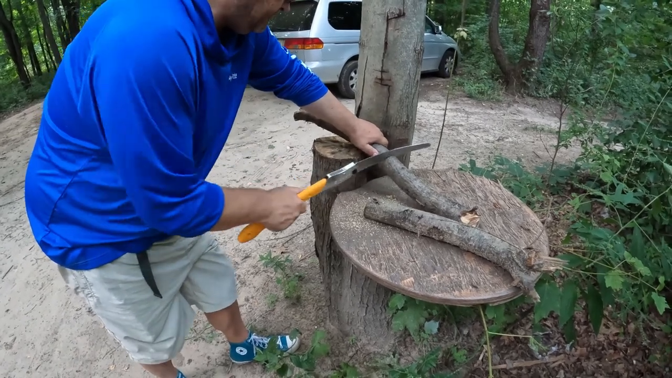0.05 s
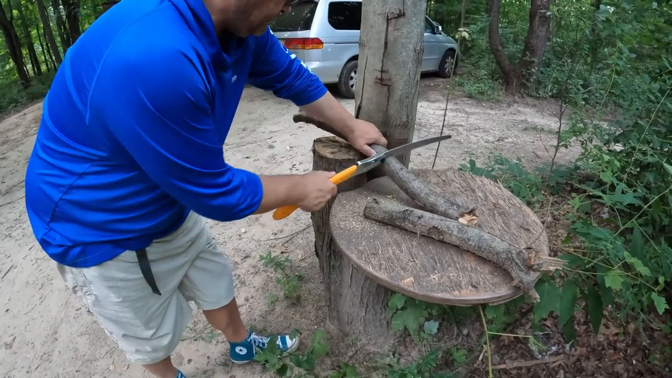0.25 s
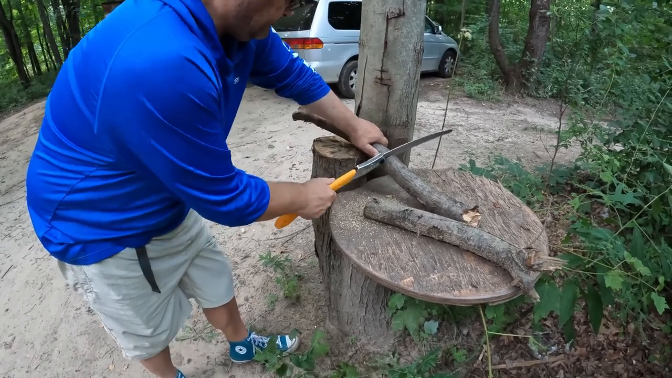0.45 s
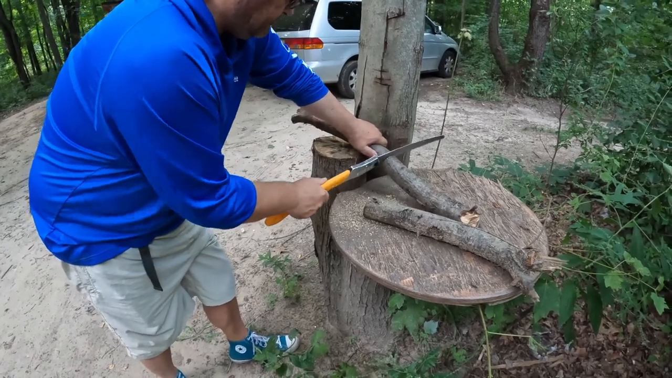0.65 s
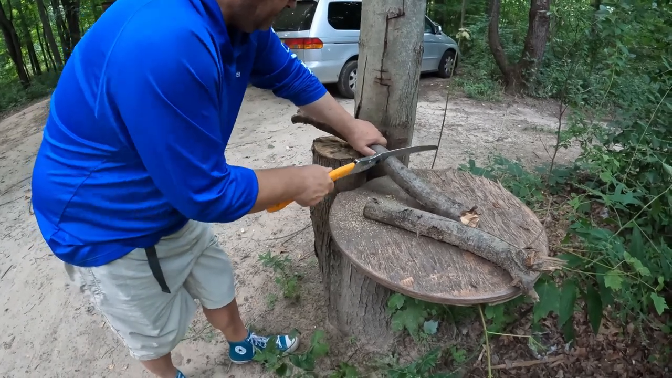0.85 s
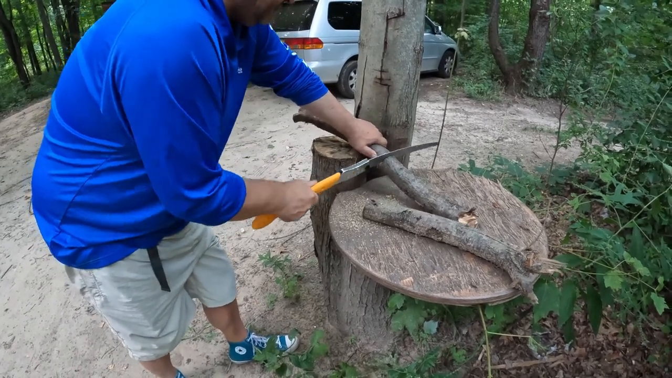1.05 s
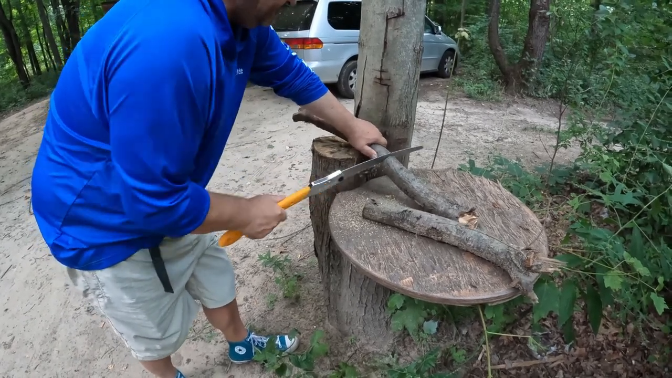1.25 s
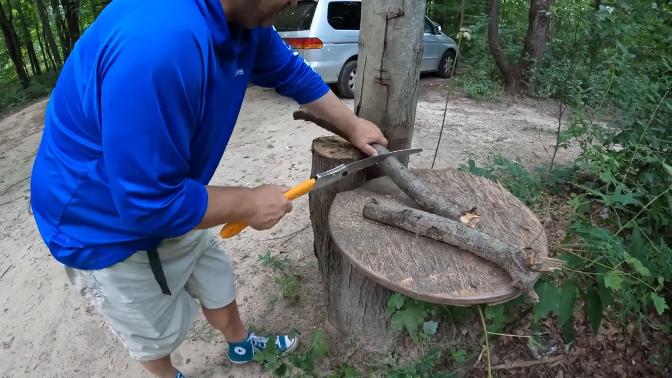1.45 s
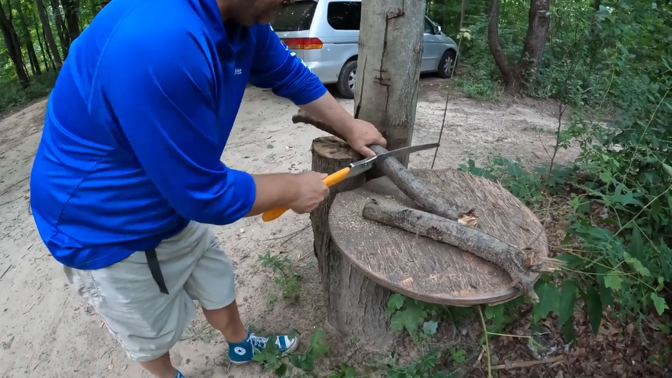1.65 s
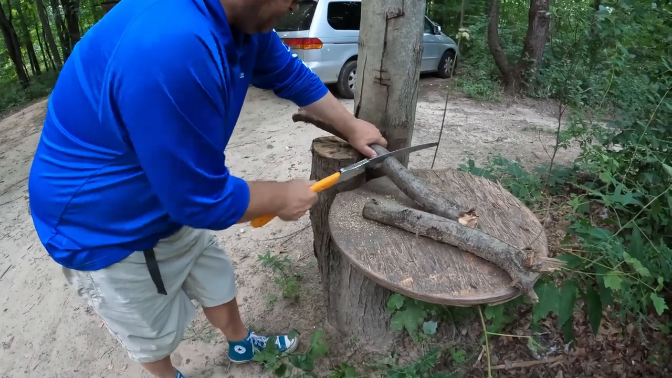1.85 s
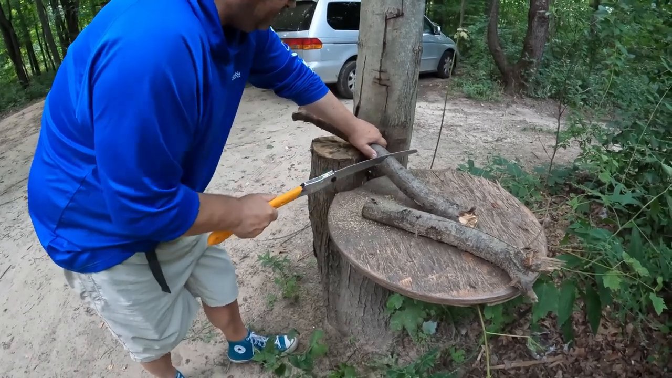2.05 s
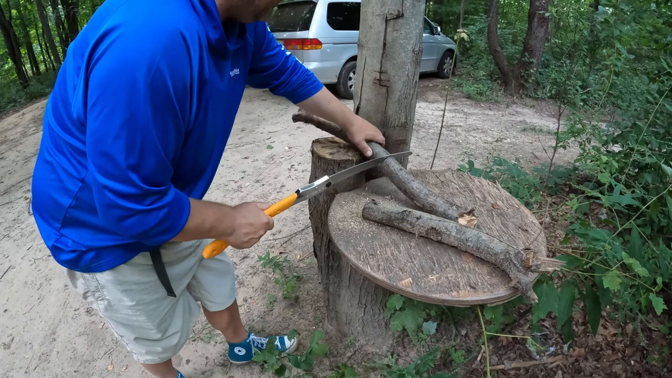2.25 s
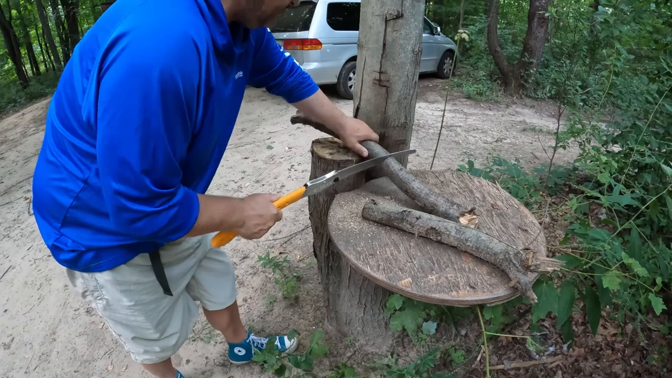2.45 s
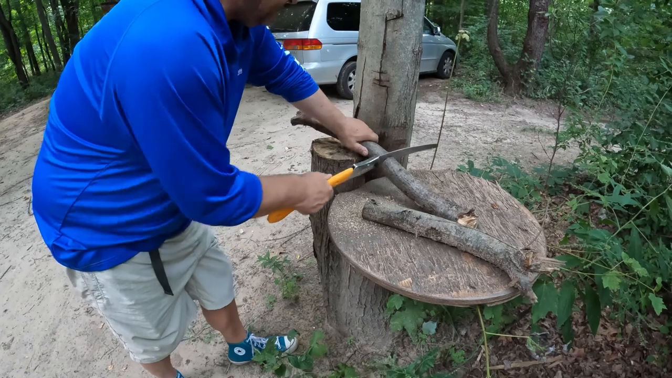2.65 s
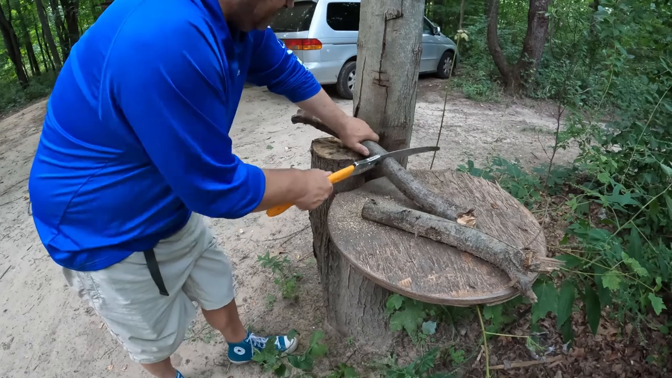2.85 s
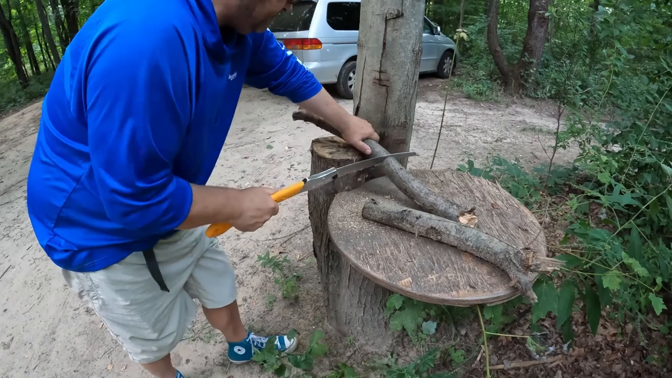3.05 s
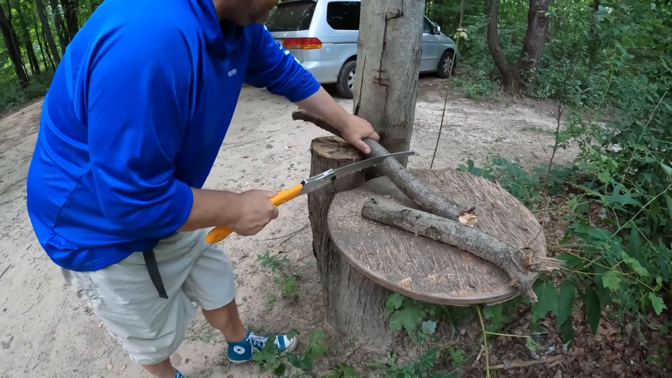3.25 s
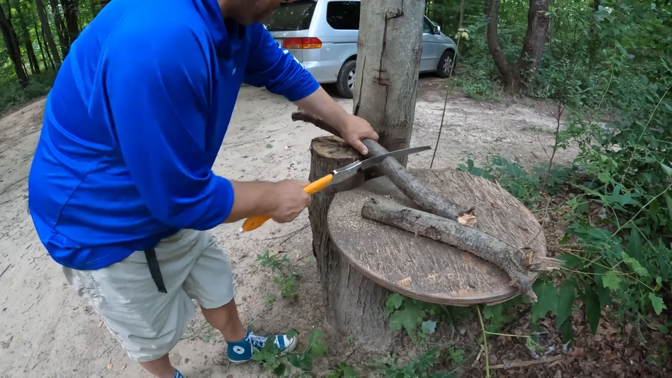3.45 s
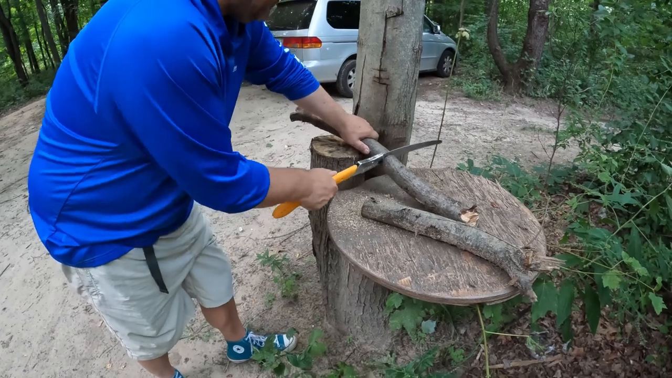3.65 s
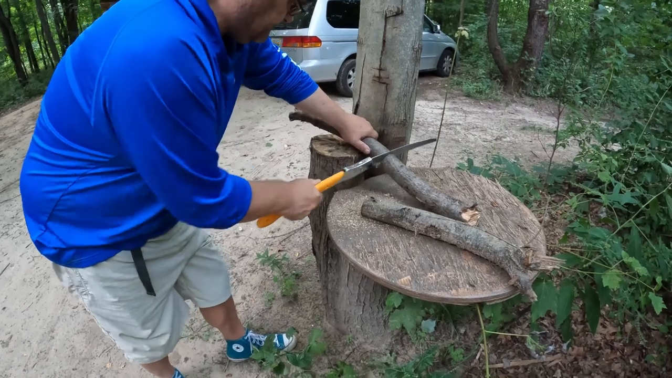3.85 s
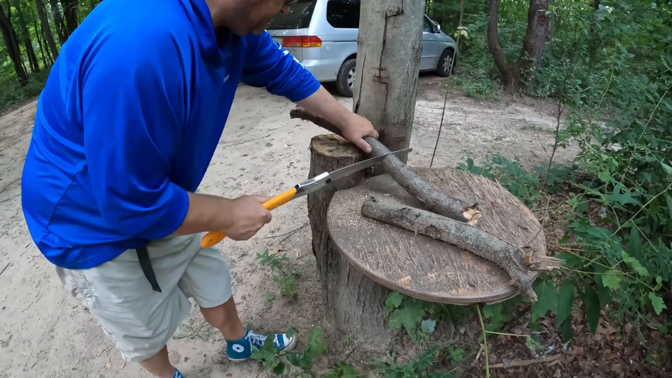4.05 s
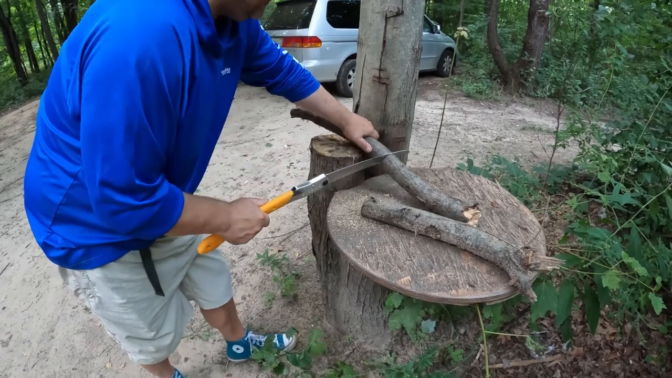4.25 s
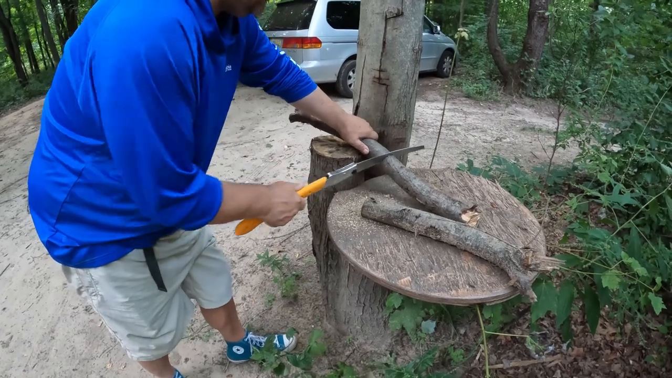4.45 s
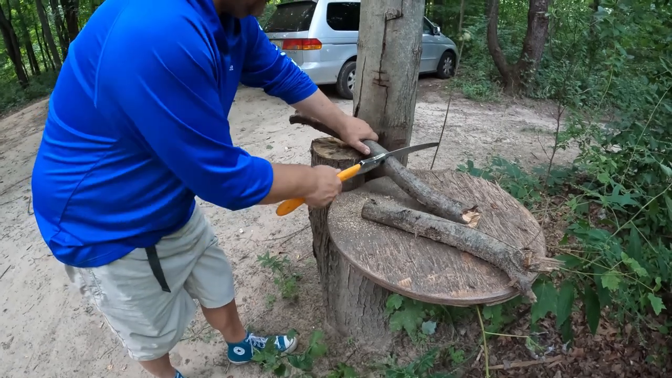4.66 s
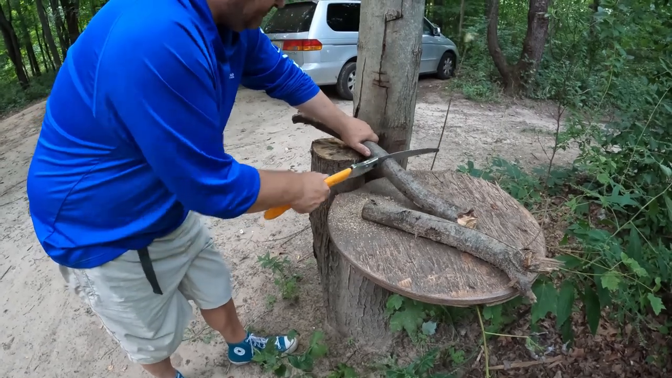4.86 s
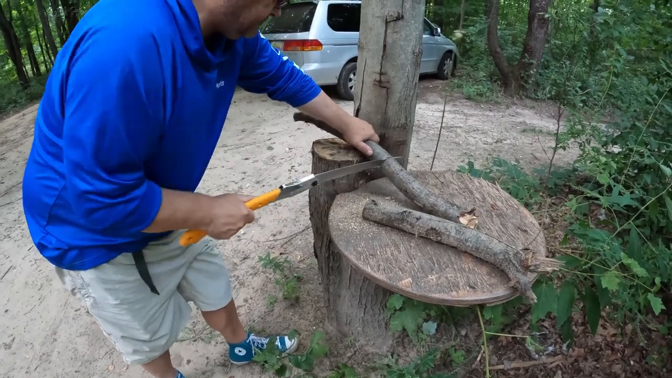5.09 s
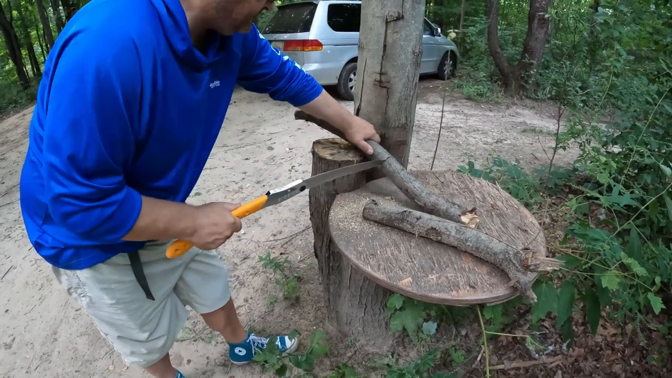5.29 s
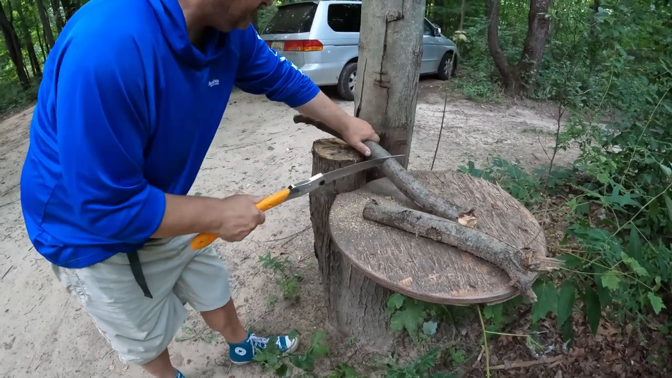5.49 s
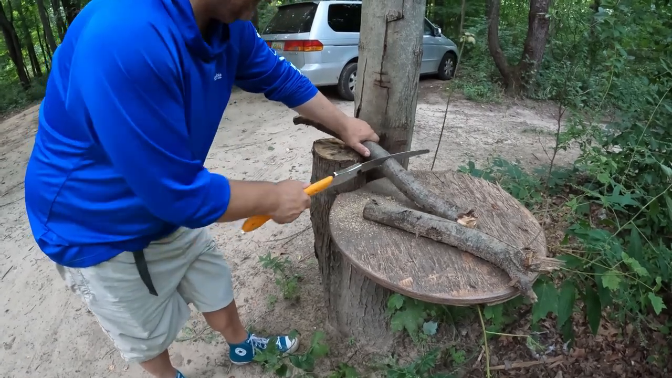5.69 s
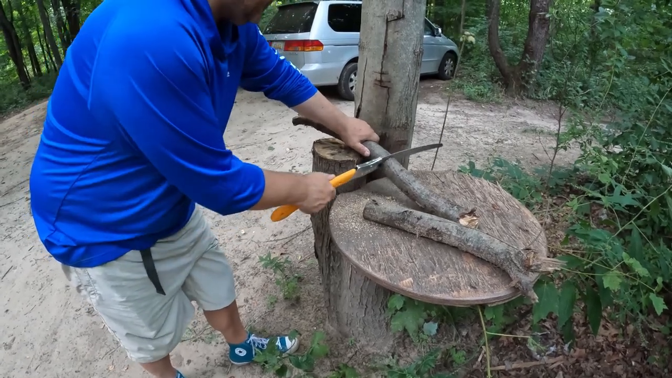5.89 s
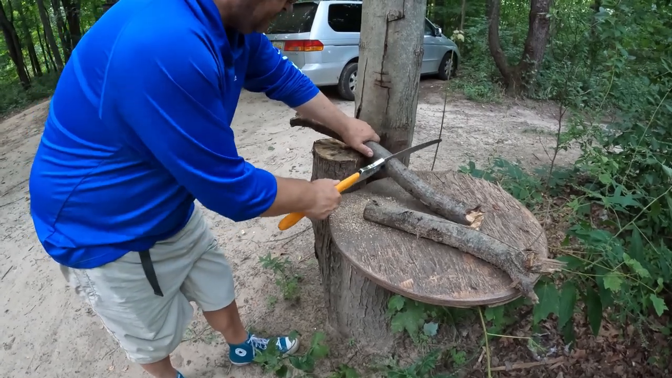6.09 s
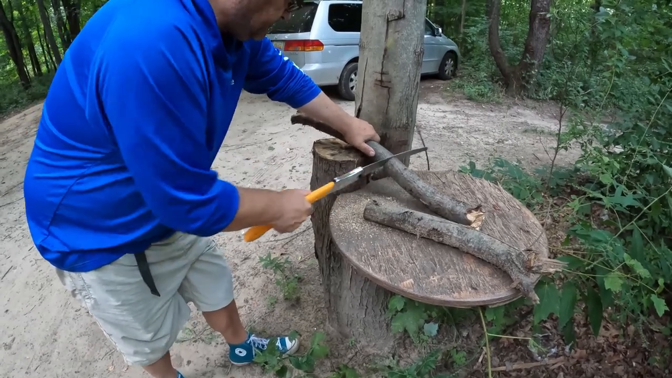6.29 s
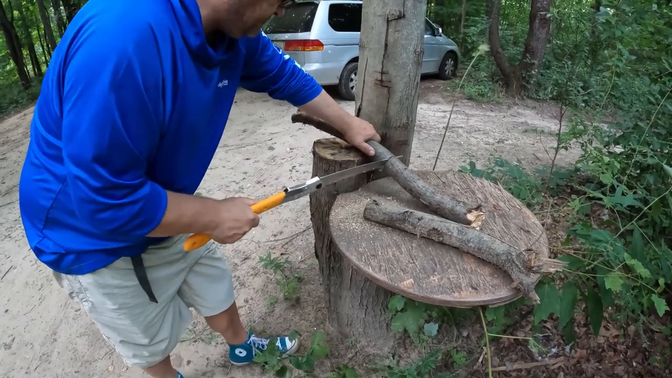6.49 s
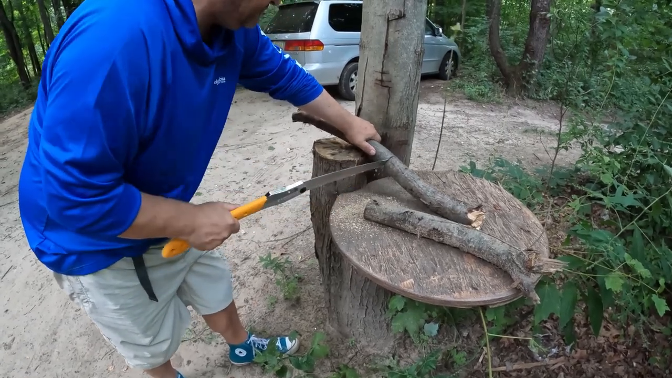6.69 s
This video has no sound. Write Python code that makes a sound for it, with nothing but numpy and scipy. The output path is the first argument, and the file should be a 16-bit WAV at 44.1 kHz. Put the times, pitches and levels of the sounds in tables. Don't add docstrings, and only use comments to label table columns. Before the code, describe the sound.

Close, uneven hand sawing of a branch outdoors: hissing, squeaky strokes, woody thumps as teeth catch, a short early pause, distant insect song.

```python
import sys
import numpy as np
from scipy import signal
from scipy.fft import rfft, irfft, next_fast_len
from scipy.io import wavfile
from scipy.ndimage import uniform_filter1d, map_coordinates

SR = 44100
rng = np.random.default_rng(int(sys.argv[2]) if len(sys.argv) > 2 else 0)


def dump(signal):
    limited = np.clip(np.atleast_2d(signal).T, -1, 1)
    pcm = np.round(limited * 32767).astype(np.int16)
    wavfile.write(sys.argv[1], SR, pcm)


def convert_level_to_amplitude(level_db):
    exponent = np.asarray(level_db, float) / 20
    return 10 ** exponent


N = 296793
STEP_S = .002


def unit(x):
    return x / np.sqrt(np.mean(x ** 2) + 1e-20)


def along(points, hz):
    f, v = np.transpose(points)
    return np.interp(np.log(hz + 1), np.log(f + 1), v)


def wobble(rate):
    knots = rng.standard_normal(int(N * rate / SR) + 4)
    return map_coordinates(knots, [np.arange(N) * rate / SR])


def filtered(x, response):
    m = next_fast_len(N + SR // 2)
    return irfft(rfft(x, m) * response(np.fft.rfftfreq(m, 1 / SR)), m)[..., :N]


def modes(table, turn=-1):
    def response(f):
        total_response = 0
        for k, (centre, width, db) in enumerate(table):
            damping = 1j * f * width
            total_response = total_response + turn ** k * convert_level_to_amplitude(db) * damping / (centre * centre - f * f + damping)
        return total_response
    return response


def grains(rate, spread_db, clump_db):
    snaps = rng.random(N) < rate / SR
    size = convert_level_to_amplitude(spread_db * rng.exponential(size=N) + clump_db * wobble(90))
    return unit(snaps * size * rng.standard_normal(N))


def arch(at, rise, fall, db, edge_db, square, slope_db=None):
    t = np.arange(0, N / SR + STEP_S, STEP_S) - at[:, None]
    progress = np.where(t < 0, t / np.abs(rise)[:, None], t / np.abs(fall)[:, None])
    off_peak = np.abs(progress)
    loss_db = edge_db * off_peak ** np.where(t < 0, *np.broadcast_to(square, 2))
    if slope_db is not None:
        rounding = .25
        loss_db = loss_db + slope_db * (np.hypot(progress, rounding) - rounding)
        loss_db = np.minimum(loss_db, 19 + 17 * off_peak)
    return db[:, None] - np.minimum(loss_db, 200), np.clip(progress, -1, 1)


def hump(at, half, db, edge_db, square):
    return arch(at, half, half, db, edge_db, square)[0]


def swing_arch(at, rise, fall, swing_db):
    return arch(at, rise, fall, swing_db, edge_db=21.5, square=5.28, slope_db=7.5)[0]


# fastest_s, rise_s, fall_s, rasp_db, swing_db
PULL_STROKES = [(-.01, .1, 0.064, -35.5, -35), (0.612, 0.11, 0.068, -38, -29.5),
                (1.141, 0.092, 0.14, -36.5, -33), (1.352, .13, .11, -31, -32),
                (2.02, 0.159, 0.13, -25.5, -26), (3.079, .17, .18, -27, -30),
                (4.04, 0.191, .24, -29, -32.5), (5.07, .15, 0.24, -26.5, -30), (6.44, .2, .26, -28.5, -33)]


def pull():
    at, rise, fall, rasp_db, swing_db = np.transpose(PULL_STROKES)
    rasp, u = arch(at, rise, fall, rasp_db, edge_db=21.5, square=(2.7, 2.7), slope_db=14)
    swing = swing_arch(at, rise, fall, swing_db) + 5.5 * u
    return rasp, rasp - 5 - 2 * u, rasp - 6, swing, 225.3 + 21.94 * u


# centre_s, half_length_s, level_db
STUMP_JOLTS = [(0.0, 0.075, -37.5), (.645, 0.1, -36.5), (1.191, 0.123, -32.5), (1.409, .12, -44),
               (2.066, 0.18, -37), (3.093, 0.16, -38.5), (4.02, 0.071, -29), (4.12, .14, -42),
               (5.086, 0.12, -37), (5.299, 0.096, -47), (6.5, 0.37, -47.5)]


def jolts():
    return hump(*np.transpose(STUMP_JOLTS), edge_db=24, square=1.43)


# fastest_s, rise_s, fall_s, rasp_db, swing_db
PUSH_STROKES = [(.14, .11, 0.1576, -39, -39), (.34, 0.17, .065, -36.5, -40),
                (1.74, 0.23, 0.15, -36.5, -32.5), (2.2, 0.091, .12, -40, -40),
                (2.69, 0.21, 0.21, -38, -39.5), (3.6, 0.21, .17, -39, -45.5), (4.68, .32, .105, -39, -39),
                (5.29, 0.11, 0.0803, -40.5, -36), (5.76, .35, .25, -39.5, -40),
                (6.02, 0.078, 0.036, -40, -45.5), (6.21, .025, 0.029, -47.5, -45.5),
                (6.74, 0.087, 0.052, -41, -43.5)]


def push():
    at, rise, fall, rasp_db, swing_db = np.transpose(PUSH_STROKES)
    rasp, u = arch(at, rise, fall, rasp_db, edge_db=18.5, square=(3.5, 5.4), slope_db=7)
    swing = swing_arch(at, rise, fall, swing_db) + 5 * u
    shake = rasp - 26.5 + 4.5 * u
    return rasp, rasp - 11 + 7.5 * u, rasp - 7 + 3.5 * u, swing, 225.3 - 15.5 * u, shake


# centre_s, half_length_s, tear_db, swing_db
TURN_BINDS = [(0.41, 0.054, -43.5, -38.5), (3.792, .042, -39.5, -37), (4.03, 0.026, -63, -36),
              (4.775, 0.061, -40.5, -34.5), (4.025, 0.027, -25, -37.5), (6.385, .035, -29.5, -35),
              (4.92, .045, -33, -36), (6.12, .045, -41, -42), (6.6, 0.072, -42, -44),
              (6.214, 0.041, -47, -42.5), (0.987, .06, -72, -60.5), (2.51, .04, -50, -47.5),
              (1.09, 0.028, -44.5, -51)]


def bind():
    at, half, tear_db, swing_db = np.transpose(TURN_BINDS)
    tear = hump(at, half, tear_db, edge_db=12, square=4.46)
    swing = tear + (swing_db - tear_db)[:, None]
    return tear - 9.5, tear, tear - 11, swing, 212 + 0 * tear


# centre_s, half_length_s, level_db
BLADE_FLARES = [
    (1.33, .04, -38.5),
    (2.67, .04, -37),
    (2.998, .03, -35),
    (4.047, 0.047, -32),
    (4.61, 0.046, -41.5),
    (5.008, .03, -36),
    (5.178, 0.067, -33.5),
    (6.54, 0.065, -36),
]


def flare():
    return hump(*np.transpose(BLADE_FLARES), edge_db=9, square=2.3)


# centre_s, half_length_s, level_db, pitch_hz
LOCKED_SWINGS = [
    (4.024, 0.03007, -17, 186),
    (4.065, .025, -25, 241),
    (6.49, 0.0564, -15.5, 207),
    (3.13, 0.033, -25.5, 225),
    (5.12, 0.043, -26, 218),
]


def lock():
    at, half, level_db, pitch_hz = np.transpose(LOCKED_SWINGS)
    swing = hump(at, half, level_db, edge_db=14, square=4)
    return swing, pitch_hz[:, None] + 0 * swing


def per_sample(steps):
    return np.interp(np.arange(N) / SR, np.arange(len(steps)) * STEP_S, steps)


def total(*levels_db):
    power = sum((convert_level_to_amplitude(db) ** 2).sum(axis=0) for db in levels_db)
    return per_sample(10 * np.log10(power + 1e-10))


def motion():
    pull_rasp, pull_tear, pull_ring, pull_swing, pull_hz = pull()
    push_rasp, push_tear, push_ring, push_swing, push_hz, push_shake = push()
    bind_rasp, bind_tear, bind_ring, bind_swing, bind_hz = bind()
    lock_swing, lock_hz = lock()
    rasp = total(push_rasp, pull_rasp, bind_rasp)
    tear = total(push_tear, pull_tear, bind_tear)
    ring = total(push_ring, pull_ring, bind_ring, flare())
    thud = total(jolts(), push_shake)
    swings = np.vstack([push_swing, pull_swing, bind_swing, lock_swing])
    notes = np.vstack([push_hz, pull_hz, bind_hz, lock_hz])
    weight = convert_level_to_amplitude(swings) ** 2
    note = per_sample((weight * notes).sum(axis=0) / weight.sum(axis=0))
    return rasp, tear - rasp, ring - rasp, thud, total(swings), note


def patchy(x, depth_db, rise):
    z = signal.stft(x, nperseg=256)[2]
    field = uniform_filter1d(rng.standard_normal(z.shape), size=2, axis=0)
    field = uniform_filter1d(field, size=9, axis=1)
    row, col = np.indices(z.shape)
    field = map_coordinates(field, [(row - rise * col) % len(z), col], order=1)
    return signal.istft(z * convert_level_to_amplitude(depth_db * unit(field)), nperseg=256)[1][:N]


def squeaks(count, life):
    when, pitch, glide, size, span = rng.random((count, 5)).T[..., None]
    t = np.arange(SR // 20) / SR
    u = np.clip(t / (life * (0.4 + span)), 0, 1)
    hz = 1800 * (8300 / 1800) ** pitch
    wave = np.sin(np.pi * u) ** 2 * np.sin(2 * np.pi * hz * t * (1 + 4.82 * (glide - .25) * t))
    wave *= 1 + 0.84 * np.sin(2 * np.pi * (150 + 400 * size) * t)
    at = (when * N).astype(int) + np.arange(len(t))
    return unit(np.bincount(at.ravel(), (convert_level_to_amplitude(7.6 * size ** 2) * wave).ravel())[:N])


# freq_hz, level_db per Hz
RASP_COLOUR = [(760, -38), (1300, -15), (1600, -8), (1790, -12.5), (2320, -1.5), (2890, -7.5), (3550, -4),
               (4510, -9.5), (6350, -4), (7570, -4.5), (8050, -8), (8840, -25), (9700, -19), (12300, -17),
               (15500, -53)]
# pitch_hz, width_hz, level_db
STEEL_MODES = [(1964, 92, 1.5), (2236, 32, 15), (3620, 27, -7.5), (6100, 20, -8), (6570, 5.1, 14),
               (7550, 40, 13.5)]


def hiss(teeth, rasp_db, tear_db):
    light = np.clip((-33 - rasp_db) / 12, .3, 1)
    source = teeth + 0.31 * light * squeaks(count=1100, life=0.036)
    steel = modes(STEEL_MODES)
    out = unit(filtered(source, lambda hz: convert_level_to_amplitude(along(RASP_COLOUR, hz)) * (1 + 0.65 * steel(hz))))
    dull = convert_level_to_amplitude(-.6 * np.clip(tear_db + 0.5, 0, 20))
    top = filtered(out, lambda hz: 1 / (1 + (7800 / (hz + 1)) ** 12))
    return out + (dull - 1) * top


# pitch_hz, width_hz, level_db
BLADE_MODES = [(985, 50, -11), (1155, 30, 0), (1235, 60, -13), (1570, 45, -14), (2330, 80, -10)]
# pitch_hz, width_hz, level_db
WOOD_MODES = [(342.6, 57, 2.5), (440, 75, 3.5), (691, 170, 2), (911, 61, -1.5)]
# pitch_hz, width_hz, level_db
STUMP_MODES = [(101.2, 35, 0)]


def saw(rasp_db, tear_db, ring_db, thud_db):
    tear_db = tear_db + 1.5 * wobble(14)
    ring_db = ring_db + 1.2 * wobble(14)
    rasp_db = rasp_db + .6 * wobble(30)
    rasp_db = rasp_db - 2 * np.clip(-61 - rasp_db, 0, 20)
    teeth = unit(patchy(grains(8000, spread_db=1.8, clump_db=1.2), depth_db=3.7, rise=.25))
    chunks = 0.55 * teeth + grains(2500, spread_db=0.0, clump_db=3.0)
    wood = modes(WOOD_MODES)
    tear = unit(filtered(chunks, lambda hz: wood(hz) * hz ** 2 / (hz ** 2 + 260 ** 2)))
    ring = unit(filtered(chunks, modes(BLADE_MODES, turn=0.89)))
    thud = unit(filtered(chunks, lambda hz: modes(STUMP_MODES)(hz) ** 2))
    cut = convert_level_to_amplitude(-1.44) * hiss(teeth, rasp_db, tear_db)
    cut = cut + convert_level_to_amplitude(tear_db - 2.78) * tear + convert_level_to_amplitude(ring_db + 0.3) * ring
    return convert_level_to_amplitude(rasp_db) * cut + convert_level_to_amplitude(thud_db - 3.5) * thud


# pitch_hz, width_hz, level_db
BRANCH_MODES = [(172.4, 67.7, -4), (218, 61.5, 0), (250.6, 43.4, -1)]


def branch(thud_db, db, hz):
    hard = np.clip((db + 31) / 16, 0, 1)
    db = db + 2.5 * (1 - hard) * wobble(22)
    turn = 2 * np.pi * np.cumsum(hz * (1 + .04 * (1 - hard) * wobble(40))) / SR
    slap = 0.2 * np.cos(2 * turn) + 0.085 * np.cos(3 * turn) + 0.0073 * np.cos(4 * turn)
    alternate = 1 + np.clip(convert_level_to_amplitude(thud_db - db + 1), 0, .25 + .35 * hard) * np.cos(turn / 2)
    unsteady = convert_level_to_amplitude(3.5 * (1 - hard) * np.tanh(wobble(45)))
    tone = np.sqrt(2) * alternate * (np.cos(turn) + hard ** 2 * slap) * unsteady
    rattle = grains(3000, spread_db=.8, clump_db=1.5)
    loose = unit(filtered(rattle, lambda hz: modes(BRANCH_MODES)(hz) ** 2))
    share = np.clip(.6 + .45 * hard, 0, 1)
    return convert_level_to_amplitude(db) * (np.sqrt(share) * tone + np.sqrt(1 - share) * loose)


# freq_hz, likeness (0 to 1)
FAR_LIKENESS = [(40, 0.94), (130, 0.29), (400, 0.1), (3000, .1), (6000, 0.77)]


def far(spectrum, patchy_db):
    pair = rng.standard_normal((2, N)) * convert_level_to_amplitude(patchy_db * wobble(6))

    def mid_side(hz):
        turn = np.arccos(np.clip(along(FAR_LIKENESS, hz), -1, 1)) / 2
        return convert_level_to_amplitude(along(spectrum, hz)) * np.array([np.cos(turn), np.sin(turn)])

    mid, side = filtered(pair, mid_side)
    return unit(np.array([mid + side, mid - side]))


# freq_hz, level_db per Hz
RUMBLE_COLOUR = [(12, -30), (20, 0), (45, -5), (57, -14), (76, -30), (200, -30), (350, -37), (866, -52),
                 (1250, -43), (1750, -42), (2300, -56), (3500, -62), (5200, -90)]


def rumble():
    return convert_level_to_amplitude(-51) * far(RUMBLE_COLOUR, patchy_db=3.0)


# freq_hz, level_db per Hz
INSECT_COLOUR = [(3000, -50), (3900, -27), (4500, -11), (4950, -2), (5300, 0), (5550, -4), (5950, -20),
                 (7800, -27), (8700, -42), (12000, -48), (15000, -70)]


def insects():
    return convert_level_to_amplitude(-60 + 1.3 * wobble(60)) * far(INSECT_COLOUR, patchy_db=1.2)


# time_s, level_db
CLOTH_LEVEL = [
    (.3, -80),
    (.46, -53),
    (.6, -55),
    (.75, -69),
    (.95, -68.5),
    (1.2, -82),
]


def cloth():
    rub = grains(5000, spread_db=3.0, clump_db=1.0)
    rub = filtered(rub, lambda hz: modes([(1500, 900, 0)])(hz) ** 2)
    time_s, level_db = np.transpose(CLOTH_LEVEL)
    return convert_level_to_amplitude(np.interp(np.arange(N) / SR, time_s, level_db)) * unit(rub)


# start_s, peak_db, blade_ring_db over peak
STUMP_KNOCKS = [
    (0.386, -19, -20),
    (3.753, -27.5, -13),
    (4.728, -34, -8.5),
    (4.762, -23, -13),
    (4.922, -23.5, -4),
    (6.036, -19.5, -5),
    (6.076, -28, -8),
    (6.097, -31.5, -0.5),
    (6.118, -29.5, -12),
]


def knocks():
    out, t = np.zeros(N + SR), np.arange(SR // 8) / SR
    for start_s, peak_db, ring_db in STUMP_KNOCKS:
        wood, steel = 0, 0
        for hz, width, level in WOOD_MODES:
            wood = wood + convert_level_to_amplitude(level + rng.normal(0, 0.53) - 60 * t / 0.016) * np.sin(2 * np.pi * hz * t)
        for hz, width, level in BLADE_MODES:
            steel = steel + convert_level_to_amplitude(level + ring_db - 60 * t / 0.06) * np.sin(2 * np.pi * hz * t)
        onset = 1 - np.exp(-t / .0006)
        out[round(start_s * SR):][:len(t)] += convert_level_to_amplitude(peak_db) * (convert_level_to_amplitude(-3) * wood + steel) * onset
    return out[:N]


# start_s, peak_db, pitch_hz
TOOTH_CATCHES = [(0.405, -22, 219), (0.589, -14, 223), (0.631, -16.5, 207), (1.191, -18.5, 210),
                 (1.393, -21, 246.4), (1.907, -6, 222), (2.207, -23.5, 240), (2.976, -22.5, 229),
                 (3.754, -28.5, 198.7), (3.859, -22, 218), (4.093, -12.5, 242.9), (4.2, -29, 233),
                 (4.877, -17, 207.4), (6.083, -23, 222), (6.21, -21.5, 207.7)]


def catches():
    out, t = np.zeros(N + SR), np.arange(SR // 8) / SR
    for start_s, peak_db, hz in TOOTH_CATCHES:
        swell = convert_level_to_amplitude(peak_db + 6.5 - 60 * t / 0.049) * (1 - np.exp(-t / 0.0048))
        out[round(start_s * SR):][:len(t)] += swell * np.sin(2 * np.pi * hz * t)
    return out[:N]


# start_s, peak_db, pitch_hz
TOOTH_TICKS = [(0.5003, -41, 5300), (0.6453, -34, 2240), (1.0755, -45, 5240), (1.1212, -17, 3430),
               (1.542, -30.5, 7370), (1.6218, -23, 2250), (1.8958, -21.5, 3380), (2.2864, -26.5, 7200),
               (2.485, -43.5, 2267), (2.9723, -15, 7475), (4.871, -22.5, 6570), (4.9032, -26, 2087)]


def ticks():
    out, t = np.zeros(N + SR), np.arange(SR // 20) / SR
    for start_s, peak_db, hz in TOOTH_TICKS:
        ping = np.sin(2 * np.pi * hz * t) + 2.54 * rng.standard_normal(len(t))
        out[round(start_s * SR):][:len(t)] += convert_level_to_amplitude(peak_db - 9.0 - 60 * t / 0.041) * ping
    return filtered(out[:N], lambda hz: convert_level_to_amplitude(along(RASP_COLOUR, hz)))


# centre_s, half_length_s
BLADE_STALLS = [
    (1.872, .016),
    (2.91, .02),
    (3.838, .012),
    (4.85, .013),
    (6.172, .014),
]


def stalls():
    t = np.arange(N) / SR
    return convert_level_to_amplitude(-12.5 * sum(np.exp(-((t - at) / half) ** 4) for at, half in BLADE_STALLS))


# freq_hz, t60_s
TREE_DECAY = [(200, 0.067), (2000, 0.49), (10000, 0.11)]


def trees(near):
    size = SR // 3
    hz, t, z = signal.stft(rng.standard_normal((2, size)), SR, nperseg=256)
    tail = signal.istft(z * convert_level_to_amplitude(-60 * t / along(TREE_DECAY, hz)[:, None]), SR, nperseg=256)[1]
    tail = tail / np.linalg.norm(tail[0])
    late = np.pad(near, (500, 0))[None]
    return convert_level_to_amplitude(-22.0) * signal.fftconvolve(late, tail, axes=1)[:, :N]


# freq_hz, likeness (0 to 1)
NEAR_LIKENESS = [(350, .999), (700, .97), (1500, .95), (3000, .88), (9000, .88), (11500, .6), (12500, 0)]
# freq_hz, level_db
PORT_LEAN = [(200, 0), (380, -1), (700, -2), (1290, -3), (2400, -4), (4400, -2), (6000, 0), (9000, 1),
             (14000, -1)]
# freq_hz, phase_rad
PORT_LEAD = [(200, 0), (1000, -.42), (1600, -.5), (2600, -1.4), (3400, -1.15), (4200, -1.6), (4650, .8),
             (5200, .25), (6000, 0), (8500, -.15), (10000, 0)]


def ports(x):
    side = np.array([[.5], [-.5]])
    direct = filtered(np.array([x, x]), lambda hz: convert_level_to_amplitude(side * along(PORT_LEAN, hz))
                      * np.exp(1j * side * along(PORT_LEAD, hz)))
    hz, t, z = signal.stft(direct, SR, nperseg=256)
    stray = np.sqrt((1 - along(NEAR_LIKENESS, hz)) / 2)[:, None]
    z = z * (1 + stray * (rng.standard_normal(z.shape) + 1j * rng.standard_normal(z.shape)))
    return signal.istft(z, SR, nperseg=256)[1][:, :N]


def scene():
    rasp_db, tear_db, ring_db, thud_db, swing_db, note_hz = motion()
    sawing = saw(rasp_db, tear_db, ring_db, thud_db) + branch(thud_db, swing_db, note_hz)
    near = sawing * stalls() + cloth() + knocks() + catches() + ticks()
    return ports(near) + trees(near) + rumble() + insects()


def low_pass(x):
    return signal.sosfilt(signal.butter(12, 15250, fs=SR, output="sos"), x)


# freq_hz, level_db
HOUSING_TOP = [(8550, 0), (8800, -7), (9050, 0), (15100, -3), (15250, -70)]


def record(dry):
    mix = filtered(dry, lambda hz: convert_level_to_amplitude(along(HOUSING_TOP, hz)))
    return low_pass(mix)


dry = scene()
out = record(dry)
dump(out)
```